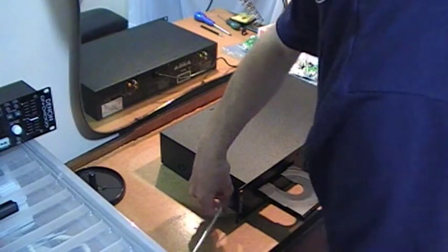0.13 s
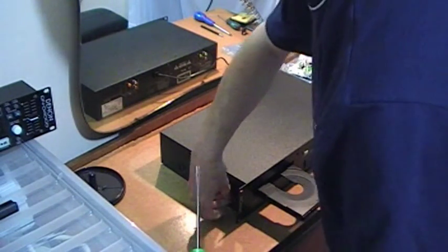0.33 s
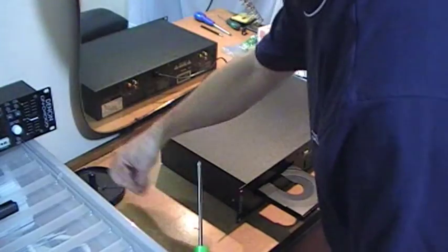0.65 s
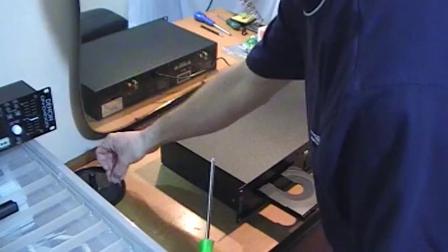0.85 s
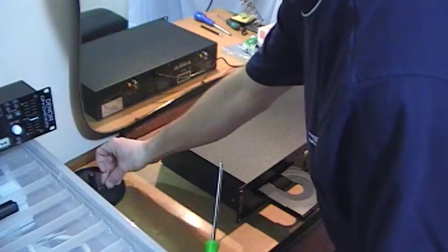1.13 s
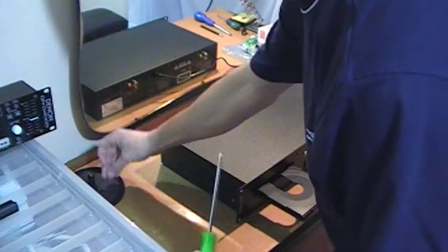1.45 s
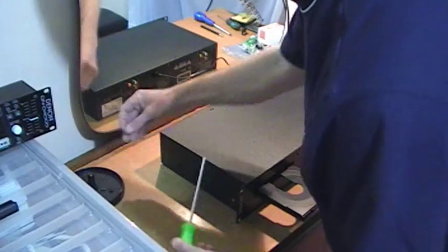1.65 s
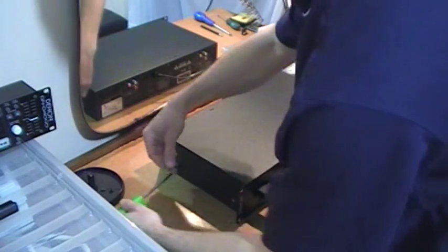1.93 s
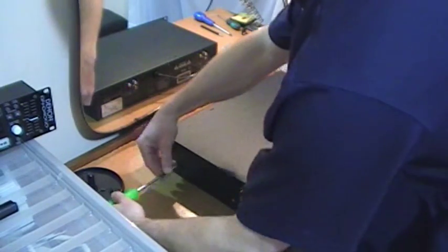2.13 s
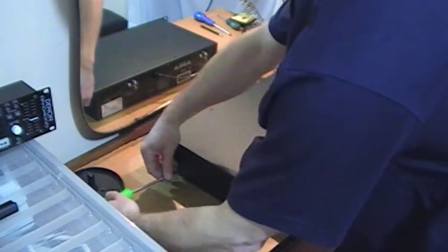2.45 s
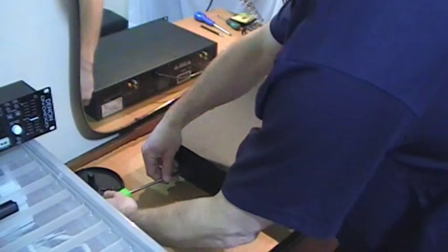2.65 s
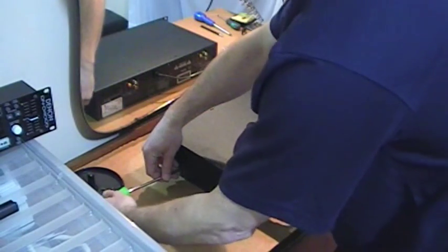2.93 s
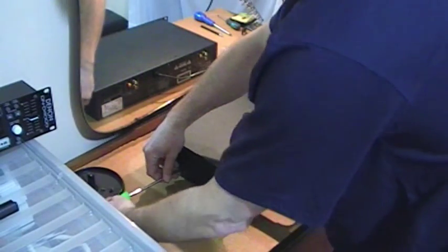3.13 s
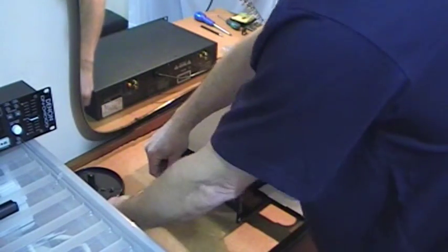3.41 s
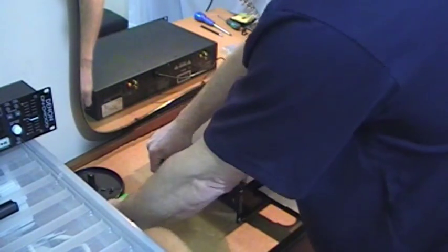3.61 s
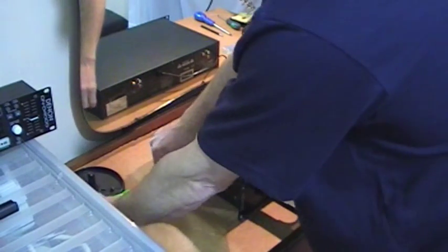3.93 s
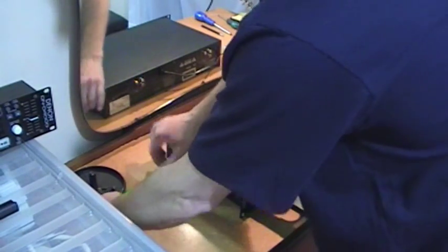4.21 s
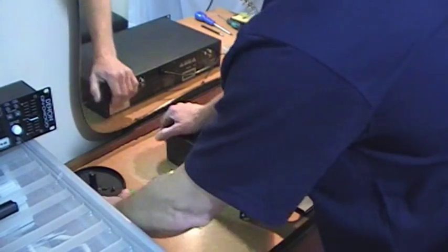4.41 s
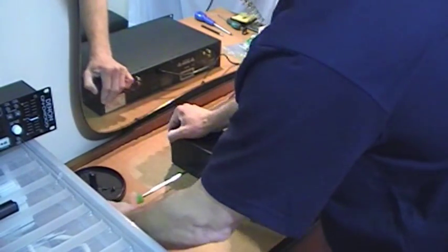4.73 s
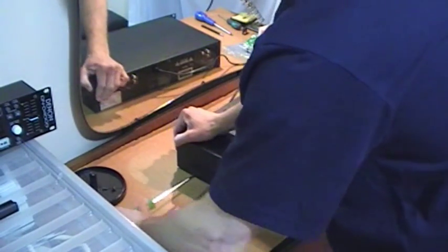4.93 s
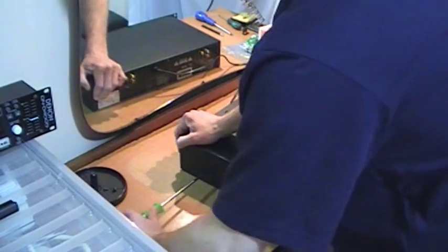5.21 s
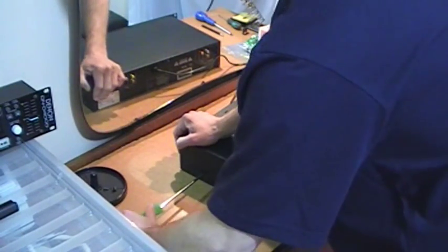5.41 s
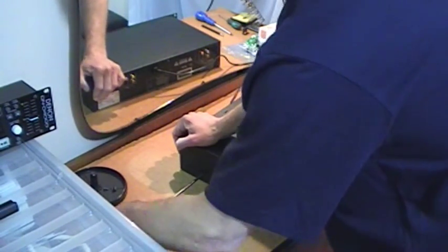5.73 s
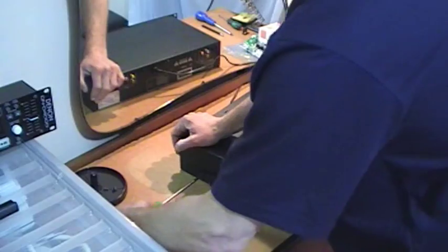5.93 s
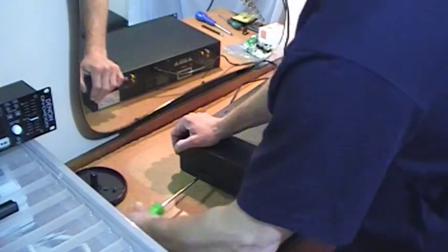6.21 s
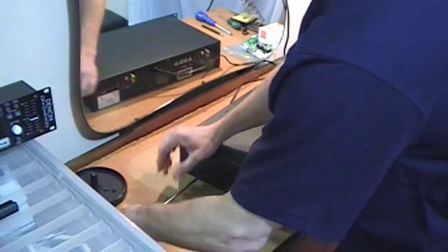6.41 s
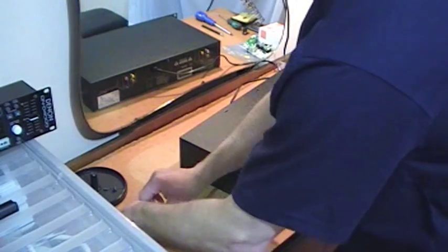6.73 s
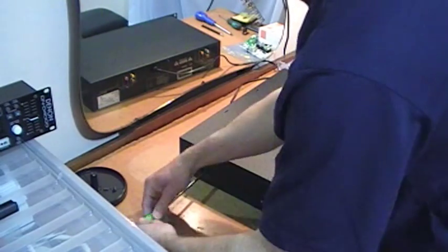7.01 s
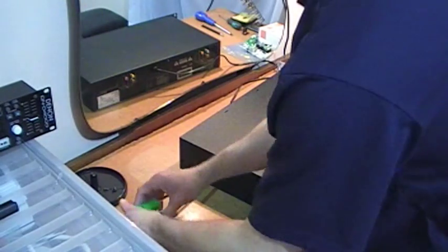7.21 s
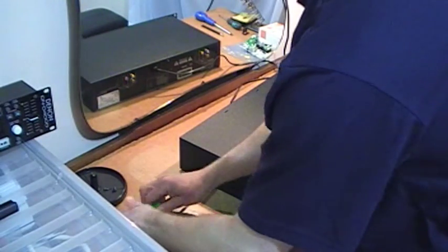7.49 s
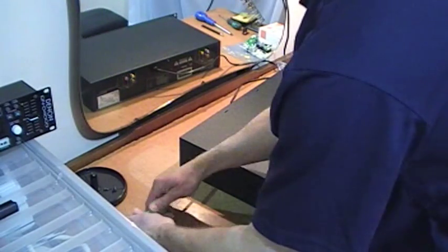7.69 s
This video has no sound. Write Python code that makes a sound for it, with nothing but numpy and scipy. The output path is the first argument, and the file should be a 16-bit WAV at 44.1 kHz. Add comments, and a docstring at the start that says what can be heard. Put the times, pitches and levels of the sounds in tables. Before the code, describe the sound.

A close, slightly roomy workbench scene over steady soft hiss, low murmur, a faint camera motor hum and a thin wavering high tone. At 0 s there is a soft bump with a brush of cloth. At about 1.1 s a small screw drops into a plastic dish with a crisp click, bounces, then rocks in ever quicker, weaker ticks until 1.8 s. Hollow knocks on a steel case come at 2.2 and 2.8 s, the sharpest and loudest at 3.2 s, ringing briefly. From 3.5 to 5.4 s come light sleeve scuffs, soft hand bumps and small blade ticks, one crisp at 4.8 s. Around 5.7 to 6.2 s, knocks, low bench thuds and light taps cluster. A strong, grainy palm swish passes at 6.4 s. From 6.8 s to the end, duller knocks, bumps, taps and gentle brushing continue irregularly.

```python
"""A soft bump and a brush of cloth, then a loose screw drops into a plastic dish and rocks to rest.
Tool and hands knock a steel equipment case on a wooden bench in a small room, heard from close by.
Panels and dish are decaying modes over a dense noise ring; each blow adds a crack of contact noise.
Sleeve and palm brush as grainy noise. Behind lie a hissy murmur, a faint camera motor hum and thin high tones."""
import sys
import numpy as np
from scipy import signal
from scipy.fft import rfft, irfft, next_fast_len
from scipy.io import wavfile
from scipy.ndimage import uniform_filter1d

SR = 44100
rng = np.random.default_rng(int(sys.argv[2]) if len(sys.argv) > 2 else 0)


def transcribe(signal):
    """Save signal, clipped to [-1, 1], as a 16-bit WAV file at the path in sys.argv[1]."""
    frames = np.atleast_2d(signal).T
    limited = np.clip(frames, -1, 1)
    pcm = np.round(limited * 32767).astype(np.int16)
    wavfile.write(sys.argv[1], SR, pcm)


N = 346626
AGE = np.arange(SR) / SR  # s since a blow
TIME = np.arange(N) / SR  # s
GRIP_HZ = 5200  # a firmer grip fills in the hiss below this

# Modes of the case on the bench. Each row: frequency in Hz, relative level in dB, t60 in seconds.
CASE_MODES = [(153.7, -20, 0.512), (202.7, -5.5, 0.41), (228.6, -5.5, 0.41), (243.4, 2, 0.4),
              (272.85, -6, 0.74), (298.85, -6, 0.73), (357.5, -2.5, 0.35394), (366, -21.5, 0.639),
              (448.13, -3.5, 0.27), (450.5, -5.5, 0.52144), (514.76, -5, 0.4633), (550.3, 4.5, 0.18),
              (570, -2.5, 0.23), (705, -4, 0.3652), (768.6, 1.5, 0.21), (780.33, -0.5, 0.22),
              (780, -4.5, 0.33), (873.64, -15, 0.59), (989.33, -7, 0.3534), (1051.1, -6.5, 0.3169),
              (1102.9, 1, 0.2), (1170, -10.5, 0.4077), (1310, -10, 0.28), (1592.4, -11.5, 0.3301),
              (1808.7, -12.5, 0.2081), (1970, -30, 0.6), (2078, -8, 0.24), (2168, -8.5, 0.26),
              (2340, -14.5, 0.4416), (2614, -17, 0.11), (2600, -5.5, 0.0971), (3145.7, -14.5, 0.32),
              (3410, -8, 0.18)]
# Dull rub of a slow stroke, also the bench's noise. Each row: frequency in Hz, relative density in dB per Hz.
RUB_COLOUR = [(60, -11.5), (150, -6.5), (280, 0), (600, 3.5), (1200, 1), (3000, -7), (6000, -22.5)]
# Stereo width of diffuse sound. Each row: frequency in Hz, side minus mid in dB.
WIDTH = [(60, -6), (180, -16), (600, -13), (1500, -11), (4000, -10), (9000, -6)]


def case_knocks():
    """Hard knocks, light blade taps and soft hand bumps all ring the same case."""
    # Hard tool knocks. Each row: start in seconds, force (middle band) in dB, bass, presence and treble
    # in dB re force, favoured low and middle modes in Hz, rise in ms.
    hard_knocks = [(2.1558, -32.5, -4.5, -11, -30, 444, 1077, 1.374),
                   (2.2652, -39, -2.5, -13, -30, 442, 1067, 2.35),
                   (2.7737, -37, -13.5, 1.8, -19.5, 457, 807.9, .4),
                   (2.873, -40.5, -10.5, -7.5, -27.5, 442, 770, 1.1),
                   (3.1867, -26, -15, -5.5, -12, 224.9, 791.3, 1),
                   (4.089, -45.5, -10, -8, -41.5, 233.9, 798, 0.1888),
                   (5.7293, -32.5, -7.5, -9, -17.5, 210.9, 747, 2.206),
                   (5.758, -45, -2.5, 5, -4, 300, 1048, .6),
                   (6.163, -36.5, -10, -4, -12.5, 420.6, 693, 2.5),
                   (6.7721, -42.5, -9.5, -14.5, -15, 462, 548, .6),
                   (6.8581, -41, -6.5, -4.5, -15, 461, 676, 1.582),
                   (7.16, -33.5, -7.5, -5.5, -17.5, 441.6, 753, 2.344),
                   (7.4925, -36, -5.5, -3, -4, 268.5, 560, 4.3),
                   (7.7432, -35.5, -2.5, -4, -5.5, 442.7, 516.9, 4.3)]
    # Light blade taps. Each row: start in seconds, force in dB.
    taps = [(5.6787, -58), (5.868, -51), (5.921, -48.5), (6.0312, -52.5), (6.092, -55), (6.816, -52),
            (7.0505, -57), (7.6605, -57.5), (7.7, -56.5)]
    # Soft hand bumps. Each row: start in seconds, force in dB, bass in dB re force, favoured low mode in Hz.
    bumps = [(0, -57.5, 1, 199.5), (.345, -61.5, 1, 365), (3.453, -54.5, -5.5, 255), (3.94, -62.5, -8, 360),
             (4.428, -45, -14, 438), (6.923, -56.5, -18, 440), (7.076, -46.5, -2.5, 450),
             (7.445, -52, -6.5, 361), (7.555, -44.5, 0, 443), (7.681, -53, -4, 358.2)]
    hard_lift_db, gentle_lift_db = 9.5, 13.5  # favoured modes stand out most in a gentle blow
    out = np.zeros((2, N))

    for s, db, bass_db, presence_db, treble_db, low_hz, middle_hz, rise_ms in hard_knocks:
        band_db = db + np.array([bass_db, 0, presence_db, treble_db])
        crack_db = 15 + 0.34 * treble_db  # the harder the contact, the more it cracks
        add(out, s, knock(band_db, (low_hz, middle_hz), hard_lift_db, crack_db, rise_ms))

    for s, db in taps:
        band_db = db + np.array([-14.5, -1, -1, -15])
        add(out, s, knock(band_db, (483, 1055.6), gentle_lift_db, crack_db=-0.5, rise_ms=0.3))

    for s, db, bass_db, low_hz in bumps:
        band_db = db + np.array([bass_db, 0, -12, -28])
        add(out, s, knock(band_db, (low_hz, 538.3), gentle_lift_db, crack_db=-5.5, rise_ms=5))
    return out


def knock(band_db, modes_hz, lift_db, crack_db, rise_ms):
    """A knock cracks, rings the panels and fills the room; a light blade tap dies sooner than a heavy knock."""
    # Dense ringing of the case. Each row: frequency in Hz, relative density in dB per Hz.
    case_colour = [(40, -52), (125, -44), (200, -13.5), (500, 0), (1100, -5.5), (1600, -10.5),
                   (3500, -15.5), (5200, -26.5), (8500, -21.5), (11000, -31.5), (15500, -55.5)]
    wash = dense_ring(case_colour, early_db=-9.5, early_s=0.034, sustain=0.97)
    panels = undb(-3) * panel_modes(modes_hz, lift_db)
    contact = crack(case_colour, crack_db, decay_s=0.0053, low_hz=910)
    lightness = np.clip((band_db[2] - band_db[0]) / 20, 0, 1)  # little bass: only the blade and a screw move
    damping = np.exp(-lightness * AGE / 0.37)
    blow = (wash + panels + contact) * attack(rise_ms) * damping
    return voice(butter(blow, 164, "high"), band_db)


def panel_modes(favoured_hz, lift_db):
    """The place of the blow favours the case's modes near two frequencies."""
    hz = np.transpose(CASE_MODES)[0]
    nearness = sum(np.exp(-(np.log(hz / f) / .04) ** 2) for f in favoured_hz)
    return ring(CASE_MODES, lift_db * nearness)


def dropped_screw(count):
    """The screw bounces in the dish, then rocks on its head in `count` ever quicker, weaker, crisper swings."""
    # Each row: start in seconds, force (presence band) in dB, bass and treble in dB re force, rise in ms.
    bounces = [(1.0599, -32.5, -28, -8, 0.26), (1.0765, -48.5, -6.5, -2, 2.4),
               (1.2146, -50, -29.5, -8.5, 2.5), (1.2483, -51, -28, 0.5, .44), (1.3156, -50, -39, 4.5, .25)]
    out = np.zeros((2, N))
    for s, db, bass_db, treble_db, rise_ms in bounces:
        band_db = db + np.array([bass_db, -5, 0, treble_db])
        add(out, s, dish_click(band_db, crack_db=19, rise_ms=rise_ms))

    s, gap_s, db, rise_ms = 1.44, .059, -51, 5.217  # first swing
    for _ in range(count):
        band_db = db + np.array([-18, 0, -2.5, -22])
        add(out, s, dish_click(band_db, crack_db=23, rise_ms=rise_ms))
        s += gap_s
        gap_s *= .91
        db -= 2.5
        rise_ms *= 0.49
    return out


def dish_click(band_db, crack_db, rise_ms):
    """One touch of the screw on the plastic dish excites the dish's modes."""
    # Each row: frequency in Hz, relative level in dB, t60 in seconds.
    dish_modes = [(900, -9.5, 0.25), (1189.7, -19, 0.39), (1424, -5, 0.31), (1765.5, -6.5, 0.42),
                  (1990, 4, 0.18), (2508.7, -11, 0.18), (2691.4, 1.5, 0.1642), (3110, -10, 0.23),
                  (4000, -13, 0.1758)]
    return small_click(band_db, crack_db, rise_ms, dish_modes, modes_db=-2, sustain=1.0, crack_s=0.00183)


def blade_ticks():
    """The blade slips in a screw head and barely rings the case."""
    # Each row: start in seconds, force (treble band) in dB, crack in dB re an 11 dB base, rise in ms.
    ticks = [(3.7593, -67.5, 16, .2), (4.83, -45, -1.5, 0.74), (5.3037, -60, 11, .6)]
    out = np.zeros((2, N))
    for s, db, crack_re_base_db, rise_ms in ticks:
        band_db = db + np.array([-16.5, -6.5, -3.5, 0])
        crack_db = crack_re_base_db + 11
        add(out, s, small_click(band_db, crack_db, rise_ms, CASE_MODES,
                                modes_db=-5.5, sustain=0.686, crack_s=0.001942))
    return out


def small_click(band_db, crack_db, rise_ms, modes, modes_db, sustain, crack_s):
    """Light steel parts give a sharp crack, a short wash and a faint ring of what they touch."""
    # Dense ringing of small parts. Each row: frequency in Hz, relative density in dB per Hz.
    small_colour = [(40, -47), (125, -29), (230, 5.5), (500, -7), (850, 2.5), (2400, 11), (3600, -1),
                    (5300, -9), (8200, -4), (11000, -15.5), (15500, -44.5)]
    wash = dense_ring(small_colour, early_db=-7.5, early_s=0.042, sustain=sustain)
    touched = undb(modes_db) * ring(modes)
    contact = crack(small_colour, crack_db, decay_s=crack_s, low_hz=722.7)
    return voice((wash + touched + contact) * attack(rise_ms), band_db)


def bench_thuds():
    """The bench top gives a short low boom as weight shifts on it: band noise under a decaying push."""
    # Each row: start in seconds, level in dB.
    thuds = [(0, -67), (3.43, -70), (4.12, -72), (4.85, -71.5), (5.39, -73), (5.52, -78), (5.66, -69),
             (5.73, -57), (5.86, -65), (6.165, -65), (6.765, -67)]
    band_hz, t60_s, rise_ms = (84.39, 155), 0.3895, 12.26
    envelope = attack(rise_ms) * np.exp(-np.log(1000) * AGE / t60_s)
    out = np.zeros((2, N))
    for s, db in thuds:
        boom = butter(noise(SR, RUB_COLOUR), band_hz, "band", order=2)
        add(out, s, undb(db) * boom / rms(boom[0]) * envelope / envelope.max())
    return out


def brushing(rub_db=-64, rub_slope=0.35835):
    """Cloth and skin slide with a grainy hiss, which grows faster with speed than the dull rub."""
    # Hiss of a fast stroke. Each row: frequency in Hz, relative density in dB per Hz.
    hiss_colour = [(300, -75), (700, -25), (1300, -6.5), (2300, -2.5), (3500, -5.5), (5200, -12),
                   (8500, -4), (11000, -11), (13000, -23.5), (15500, -44)]
    hiss_db, gripped_db = stroke_levels()
    grain = np.sqrt(.72 + .28 * catches(rate_hz=900, spread_db=2) ** 2)
    slide = noise(N, hiss_colour) * grain * undb(1.5)
    upper = butter(slide, GRIP_HZ, "high") * undb(hiss_db)
    lower = butter(slide, GRIP_HZ, "low") * undb(gripped_db)
    rub_level_db = rub_db + rub_slope * (gripped_db - np.mean(gripped_db)) + 0.4 * walk(35)
    rub = noise(N, RUB_COLOUR) * undb(rub_level_db)
    return upper + lower + rub


def stroke_levels():
    """Each stroke speeds up and slows down; returns the level in dB of the hiss above and below GRIP_HZ."""
    # Each row: fastest moment in seconds, hiss level in dB before brushing()'s lift, times to swell and to fade
    # by 10 dB in seconds (25 ms if shorter), grip in dB.
    strokes = [(.12, -74, .2, 0.1, 3), (0.266, -61.5, 0.04, .035, 7), (2.46, -74, 0.6, 0.4, -1),
               (3.52, -62.5, 0.16, 0.3, -5.5), (3.972, -59, 0.09, .115, -2), (4.222, -60, 0.06, 0.1, -2),
               (4.447, -54, 0.0245, 0.06, 0), (4.67, -61.5, 0.2, 0.07, -6.5), (4.889, -55, 0.1, .115, -6),
               (5.15, -69, 0.2578, 0.4, -11), (5.45, -69.5, .12, 0.9, -2), (5.69, -60.5, .06, 0.188, -1.5),
               (5.85, -59, 0.08, 0.13, 1), (6.0, -60.5, 0.07, 0.02, -11), (6.417, -40.5, 0.1025, .057, 1),
               (6.84, -63, 0.1368, 0.24, -1.5), (7.1, -59.5, 0.06, 0.12, -4.5), (7.292, -65, 0.23, 0.1, 0),
               (7.47, -58, 0.06, .06, -1.5), (7.71, -58, 0.07, -1, 0)]
    roundness = 1.33  # 1 would be a pointed peak
    upper = lower = undb(-78) ** 2  # the cloth is never quite still
    for s, db, swell_s, fade_s, grip_db in strokes:
        span_s = np.maximum(np.where(TIME < s, swell_s, fade_s), .025)
        away = np.abs(TIME - s) / span_s
        power = undb(db - 10 * np.minimum(away, 10) ** roundness) ** 2
        upper = upper + power
        lower = lower + power * undb(grip_db) ** 2
    return 10 * np.log10(upper), 10 * np.log10(lower)


def catches(rate_hz, spread_db):
    """Fibres and skin ridges catch and let go: short swells of very uneven size, rms 1."""
    chance, size = rng.random(N), rng.exponential(size=N)
    snags = (chance < rate_hz / SR) * undb(spread_db * np.minimum(size, 5))
    swell = signal.lfilter([1], [1, -np.exp(-1 / (.0015 * SR))], snags)  # 1.5 ms decay
    return swell / rms(swell)


def background():
    """Smooth hiss and murmur, mostly opposed on the two microphones, with the camera's hum, whine and whistle."""
    # Still room and microphone hiss. Each row: frequency in Hz, relative density in dB per Hz.
    floor_colour = [(40, -29), (100, -5.5), (200, 7.5), (600, -8), (1300, -10.5), (2200, -1), (4000, 4),
                    (6000, 0), (8500, -3), (11000, -10.5), (13000, -36), (15500, -41)]
    # Tilt of the side's colour against the mid's. Each row: frequency in Hz, tilt in dB.
    floor_side = [(60, 6), (110, -2), (200, -3.5), (380, 14), (700, 16.5), (1290, 14), (2380, -4.5),
                  (4400, -15.5), (8120, -16.5), (15000, 9)]
    side_colour = [(hz, db + on_log_axis(hz, floor_side)) for hz, db in floor_colour]
    mid = noise(N, floor_colour)[0] * undb(-74.5 + 1.0 * walk(2.2))
    side = noise(N, side_colour)[0] * undb(-60 + 0.37 * walk(3.221))
    whistle = tone(15622, -94)
    return np.array([mid + motor_hum() + whine() + whistle, side])


def motor_hum():
    """The camera's motor hums at a few steady pitches that drift slightly in pitch and level."""
    # Each row: mean frequency in Hz, mean level in dB rms.
    hum_tones = [(727, -83), (1093, -74), (1459, -83)]
    return sum(tone(hz * (1 + .002 * walk(14)), db + 1.2 * walk(5)) for hz, db in hum_tones)


def whine():
    """A thin high tone that wavers and grows louder in spells."""
    # Each row: middle in seconds, length in seconds, highest level in dB rms, added waver in Hz.
    spells = [(.35, .9, -79, 280), (1.75, .3, -85, 30), (2.9, .5, -78, 60)]
    centre_hz, rest_db = 10760, -91
    db, waver_hz = rest_db, 0
    for s, length_s, top_db, spell_waver_hz in spells:
        spell = np.exp(-(2 * (TIME - s) / length_s) ** 4)
        db = db + spell * (top_db - rest_db)
        waver_hz = waver_hz + spell * spell_waver_hz
    hz = centre_hz * (1 + .004 * walk(20)) + waver_hz * walk(20)
    return tone(hz, db - 4 * np.abs(walk(12)))


def ring(modes, lift_db=0, scatter_db=2):
    """Modes after one blow, each a little different in strength and pitch; returns (mid, side)."""
    hz, db, t60_s = np.transpose(modes)
    scatter, lean, detune = rng.standard_normal((len(hz), 3)).T
    gain = undb(db + lift_db + scatter_db * scatter)
    side_gain = gain * lean * undb(on_log_axis(hz, WIDTH))
    phase = 2 * np.pi * (np.outer(hz * (1 + 0.0038 * detune), AGE) + rng.random((len(hz), 1)))
    rings = np.sin(phase) * np.exp(-np.log(1000) * np.outer(1 / t60_s, AGE))
    return np.array([gain, side_gain]) @ rings


def dense_ring(colour, early_db, early_s, sustain):
    """Countless overlapping modes and room echoes: strong at first, then a tail in which the treble dies soonest."""
    # Decay of case and room together. Each row: frequency in Hz, t60 in seconds before the sustain factor.
    decay = [(200, 0.5278), (600, 0.49), (1500, 0.4), (4000, 0.35), (10000, 0.16)]
    spectrum, hz = rfft(noise(SR, colour)), np.arange(SR // 2 + 1)
    centres_hz, t60s = np.transpose(decay)
    tail = 0
    for share, t60_s in zip(np.eye(len(decay)), t60s):
        band = irfft(spectrum * on_log_axis(hz, np.c_[centres_hz, share]), SR)
        tail = tail + band * np.exp(-np.log(1000) * AGE / (t60_s * sustain))
    return tail * (1 + undb(early_db) * np.exp(-AGE / early_s))


def crack(colour, db, decay_s, low_hz):
    """The few milliseconds of hard contact that reach the microphone directly."""
    return undb(db) * butter(noise(SR, colour), low_hz, "high", order=1) * np.exp(-AGE / decay_s)


def attack(rise_ms):
    """A soft push or a scrape builds up slowly, a hard hit almost at once."""
    return 1 - np.exp(-AGE * 1000 / max(rise_ms, .1))


def voice(sound, band_db):
    """Force and hardness of a blow set its opening level in the bass, middle, presence and treble."""
    a, b, c = 420, 1300, 4500  # band edges, Hz
    opening = AGE < .04
    bands = (butter(sound, a, "low"), butter(sound, (a, b), "band"),
             butter(sound, (b, c), "band"), butter(sound, c, "high"))
    return sum(band * undb(db) / rms(band[0, opening]) for band, db in zip(bands, band_db))


def tone(hz, db):
    """A sine of the given rms level whose pitch may move."""
    return np.sqrt(2) * undb(db) * np.sin(2 * np.pi * np.cumsum(hz * np.ones(N)) / SR)


def noise(n, colour):
    """Coloured noise as (mid, side), the mid at rms 1."""
    size = next_fast_len(n)
    hz = np.arange(size // 2 + 1) * SR / size
    spectrum = rfft(rng.standard_normal((2, size))) * undb(on_log_axis(hz, colour))
    spectrum[1] *= undb(on_log_axis(hz, WIDTH))
    y = irfft(spectrum, size)[:, :n]
    return y / rms(y[0])


def walk(rate_hz):
    """Random levels held 1 / rate_hz s and slewed twice."""
    k = int(SR / rate_hz)
    held = np.repeat(rng.standard_normal(N // k + 1), k)
    return 0.96 * uniform_filter1d(uniform_filter1d(held, k), k)[:N]


def butter(x, hz, kind, order=3):
    """Causal Butterworth filter."""
    return signal.sosfilt(signal.butter(order, hz, kind, fs=SR, output="sos"), x)


def on_log_axis(hz, points):
    """Join (Hz, value) points by straight lines over log frequency."""
    f, value = np.transpose(points)
    return np.interp(np.log(hz + 1), np.log(f), value)


def undb(db):
    """Decibels to gain."""
    return 10 ** (np.asarray(db) / 20)


def rms(x):
    """Root mean square."""
    return np.sqrt(np.mean(x ** 2))


def add(out, s, sound):
    """Mix a sound in at time s."""
    i = max(int(s * SR), 0)
    out[:, i:i + sound.shape[1]] += sound[:, :N - i]


def scene():
    """All sources as mid and side, turned into left and right, a little right of centre."""
    blows = case_knocks() + dropped_screw(count=7) + blade_ticks() + bench_thuds()
    mid, side = blows + brushing() + background()
    return np.array([undb(-.35) * mid + side, undb(.35) * mid - side])


def record(dry):
    """The camera cuts the rumble below 70 Hz and the top above 15.9 kHz."""
    top_cut = signal.ellip(8, .2, 70, 15900, fs=SR, output="sos")
    return signal.sosfilt(top_cut, butter(dry, 70, "high"))


dry = scene()
out = record(dry)
transcribe(out)
```